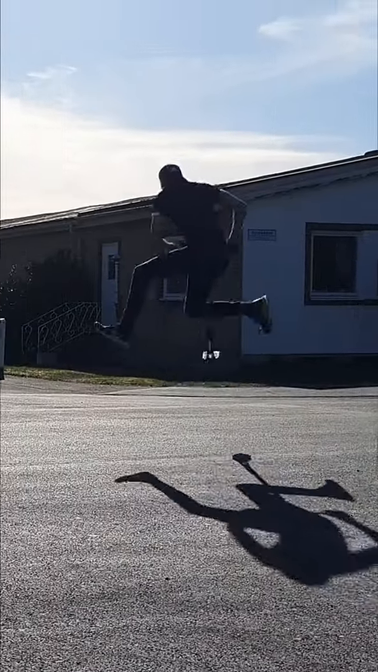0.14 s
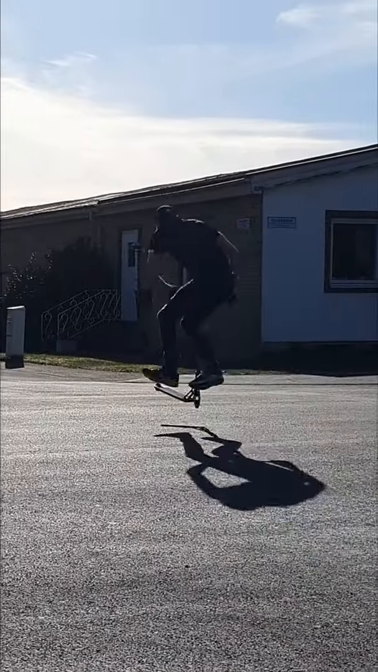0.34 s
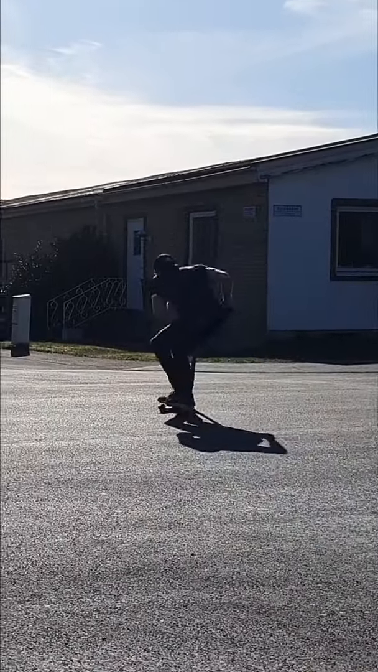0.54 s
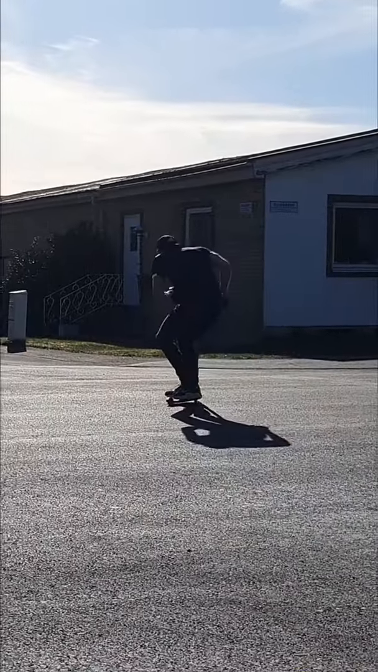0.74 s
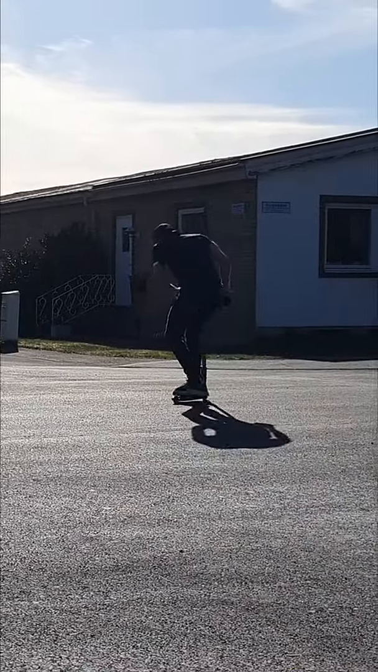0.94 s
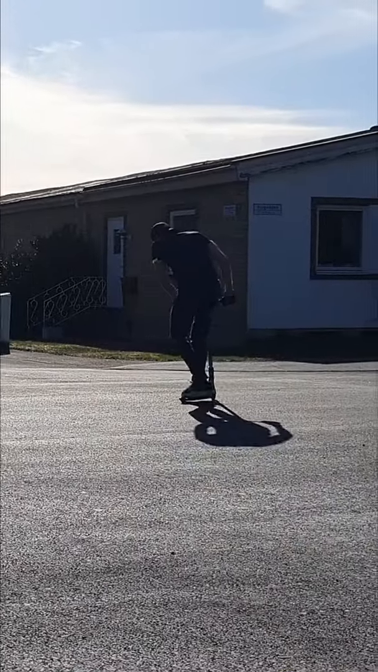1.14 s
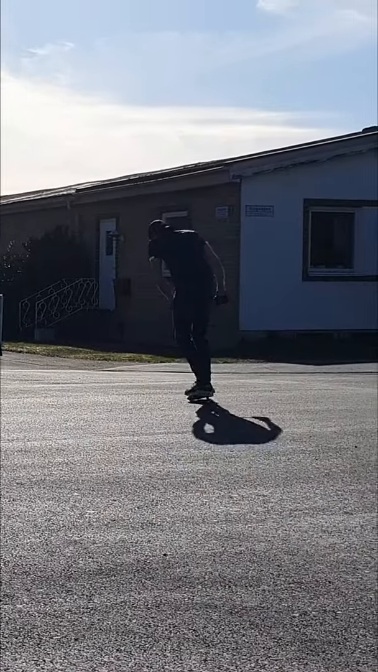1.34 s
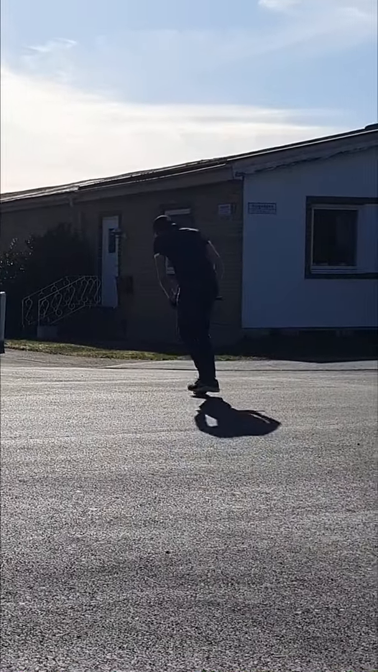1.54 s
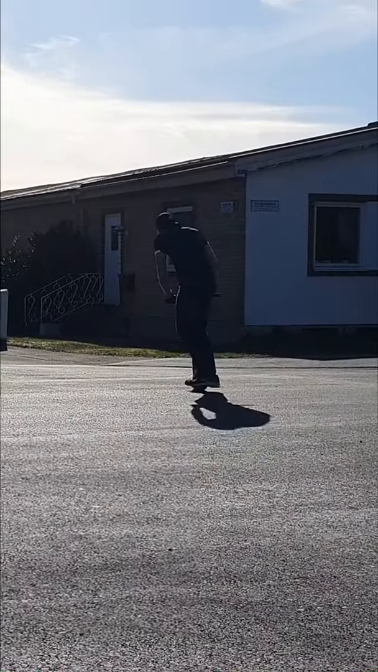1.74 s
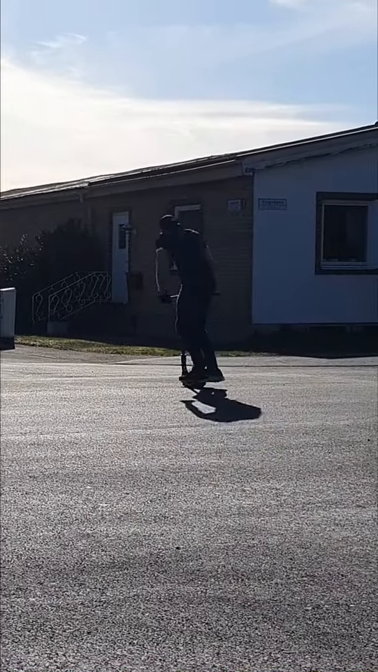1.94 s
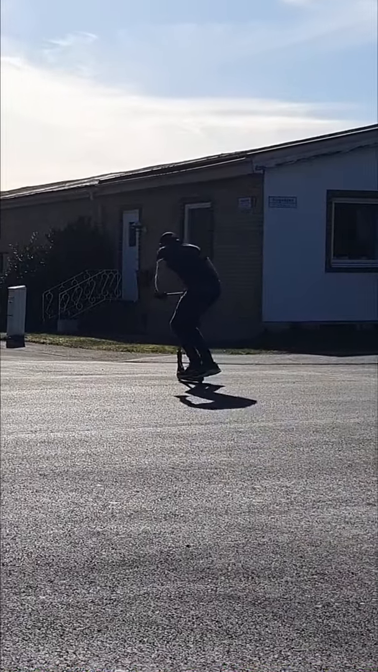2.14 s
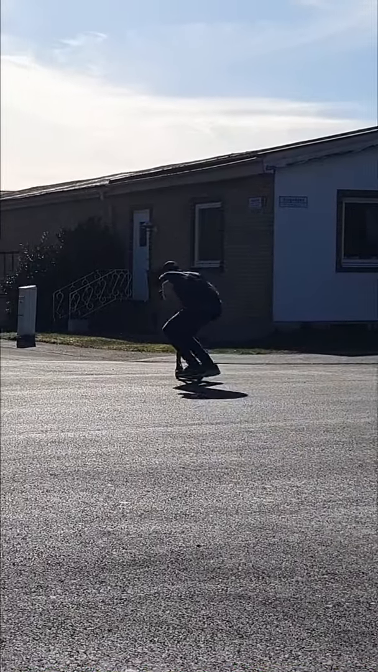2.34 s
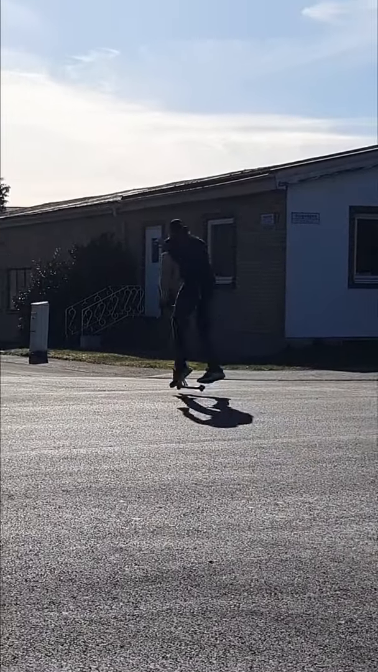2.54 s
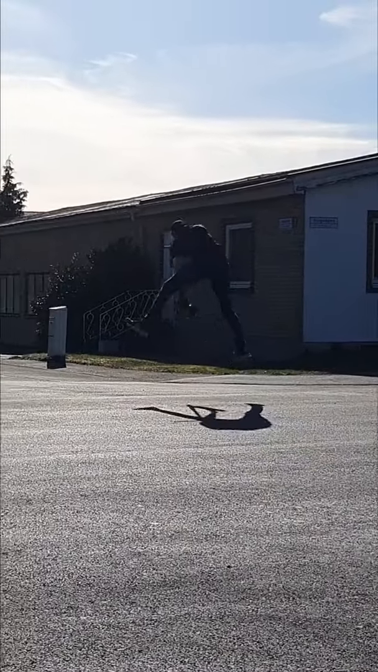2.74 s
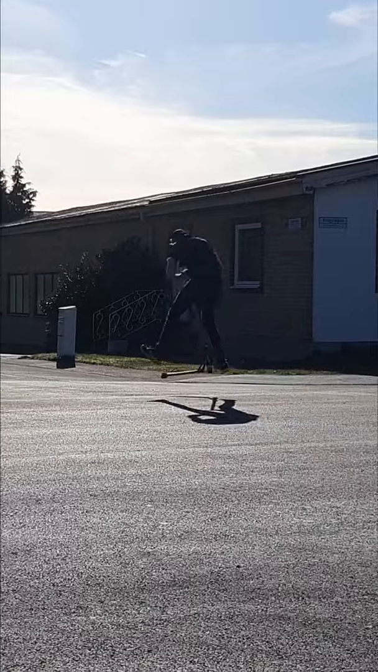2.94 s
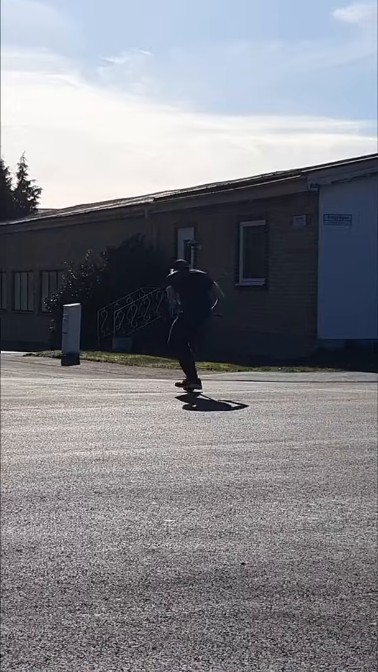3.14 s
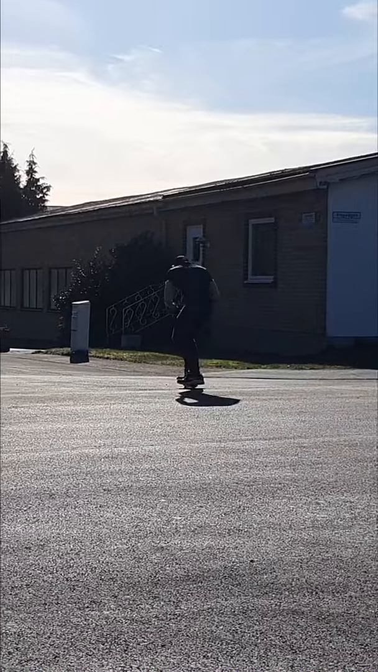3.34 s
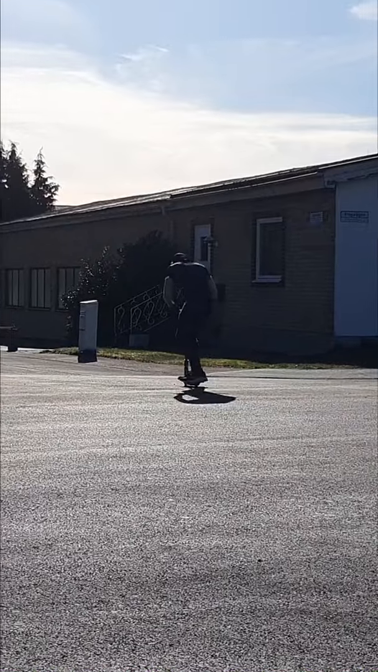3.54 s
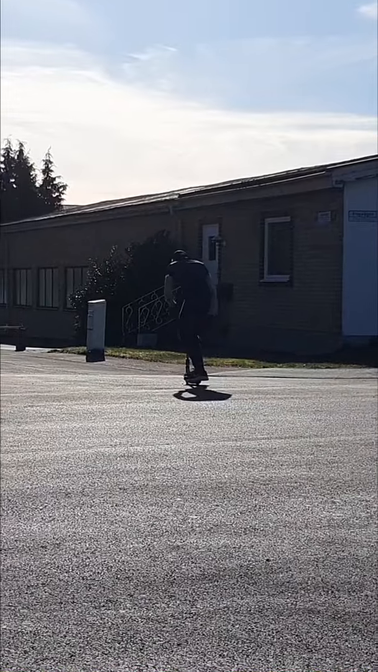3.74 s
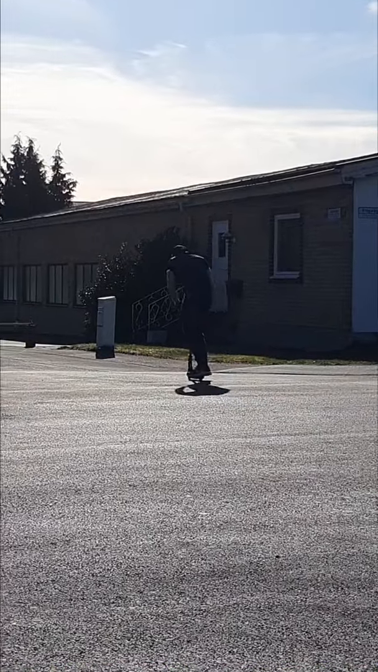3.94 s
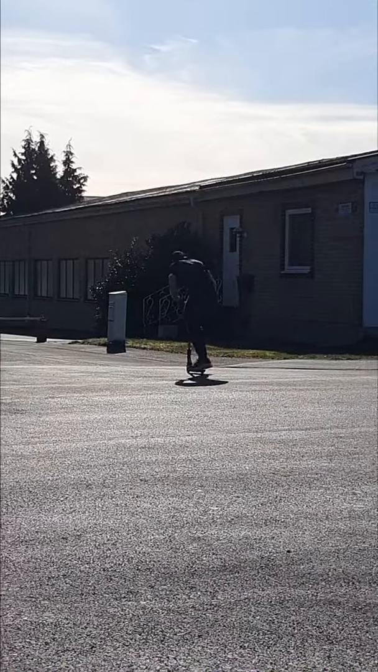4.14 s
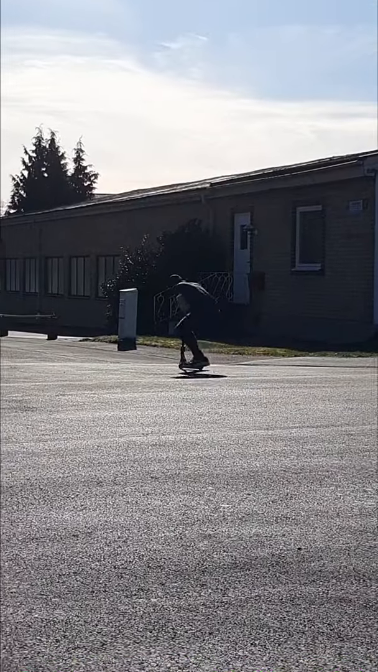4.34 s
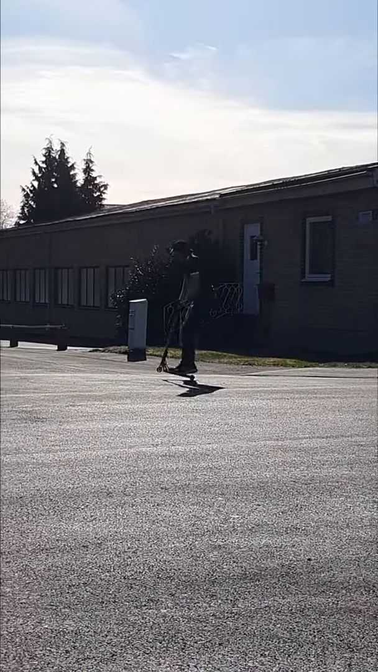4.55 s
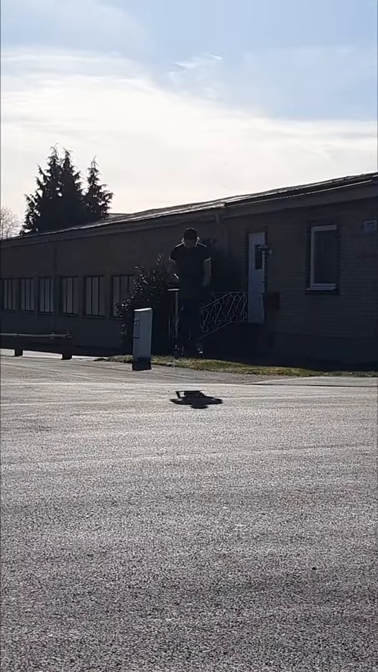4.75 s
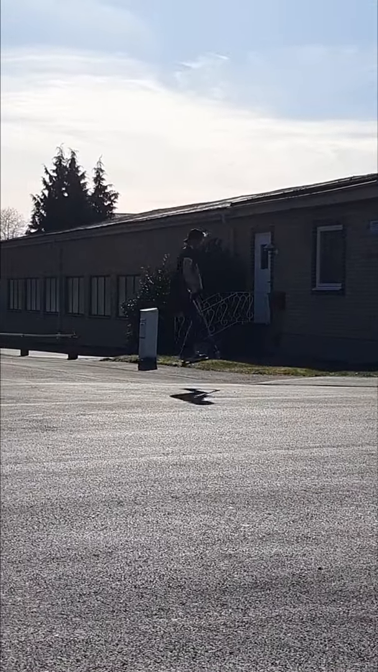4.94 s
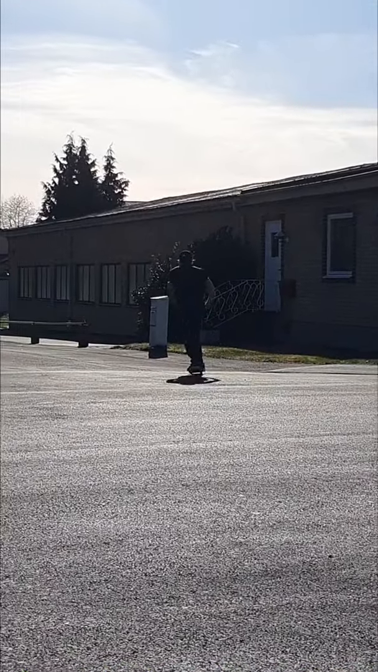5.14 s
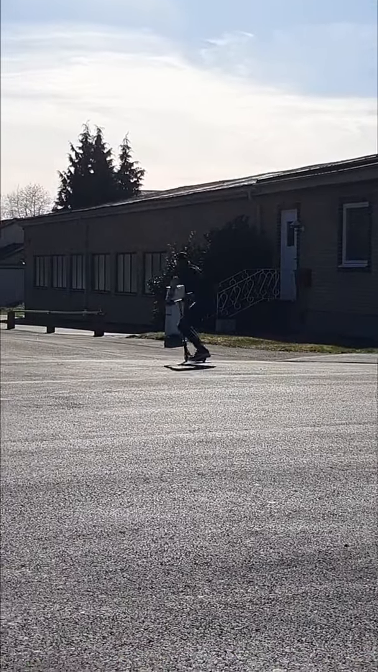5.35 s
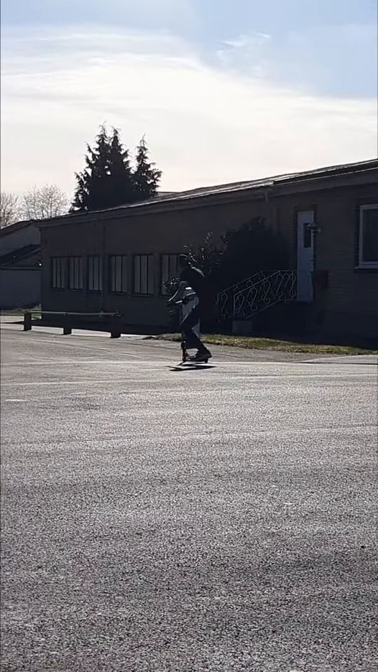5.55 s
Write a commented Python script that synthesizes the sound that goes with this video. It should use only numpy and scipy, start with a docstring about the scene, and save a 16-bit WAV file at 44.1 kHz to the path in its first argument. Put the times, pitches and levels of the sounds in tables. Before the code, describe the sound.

A scooter trick: light knocks, one loud echoing landing crack, then two more rattling jumps and landings, with low wind buffeting the microphone.

```python
"""On asphalt along low houses, a kick scooter rider jumps, spins the deck, lands and moves away.
Knocks are bursts of tiny grains that clack, clank and thud; the handlebar tubes ring as decaying tones.
Whirrs, rattles, swishes, scuffs and scrapes are uneven noise in moving bands; the walls echo them.
Wind puffs thump each microphone port as short, sagging swings, over a faint wash of far traffic."""
import sys
import numpy as np
from scipy import signal
from scipy.io import wavfile
from scipy.ndimage import uniform_filter1d

SR = 44100
rng = np.random.default_rng(int(sys.argv[2]) if len(sys.argv) > 2 else 0)


def transcribe(u):
    """Save the signal u as a 16-bit wav file named by the first command-line argument.

    u: samples, shape (n,) or (channels, n), limited to [-1, 1]; the rate is SR.
    q: integer samples, one column per channel.
    """
    v = np.clip(np.atleast_2d(u).T, -1, 1)
    q = np.round(v * 32767).astype(np.int16)
    wavfile.write(sys.argv[1], SR, q)


N = 246519  # length [samples]


def gain_of(db):
    """Turns decibels into a plain multiplier."""
    return 10 ** (np.asarray(db) / 20)


def evened(x):
    """Scales a sound to an average (RMS) strength of 1."""
    return x / np.sqrt(np.mean(x ** 2) + 1e-20)


def read(points, hz):
    """Reads a curve of (pitch, value) points, with pitch spaced by octaves as the ear hears it."""
    f, value = np.transpose(points)
    return np.interp(np.log(hz + 1), np.log(f + 1), value)


def add(mix, s, sound):
    """Adds a sound into the mix from s seconds on, cutting what runs past the end."""
    part = mix[..., round(s * SR):][..., :sound.shape[-1]]
    part += sound[..., :part.shape[-1]]


def sides(pan_db):
    """Gains of the two channels for a left-right difference; above zero is louder on the left."""
    return gain_of(np.array([pan_db / 2, -pan_db / 2]))


def coloured(x, points):
    """Gives x a spectrum with a filter that only looks back in time, so attacks stay sharp."""
    hz = abs(np.fft.fftfreq(8192, 1 / SR))
    log_gain = np.log(gain_of(np.maximum(read(points, hz), -100)))
    # the Hilbert transform finds the phase that puts the filter's energy first
    taps = np.fft.ifft(np.exp(np.conj(signal.hilbert(log_gain)))).real[:4096]
    return signal.oaconvolve(x, taps / np.linalg.norm(taps))[:len(x)]


def resonate(x, hz, width):
    """A resonance of gain 1: shifts the pitch hz (may glide) down to zero, smooths, shifts back."""
    turn = np.exp(2j * np.pi * np.cumsum(hz * np.ones(len(x))) / SR)
    keep = np.exp(-np.pi * width / SR)
    smooth = signal.lfilter([1 - keep], [1, -keep], x / turn)
    return 2 * (turn * smooth).real


def grit(count, spread_db):
    """Noise whose single samples differ widely in size: many tiny grains."""
    sizes = gain_of(spread_db * np.minimum(rng.exponential(1, count), 5))
    return evened(rng.standard_normal(count) * sizes)


# resonances of the metal deck: (pitch [Hz], width [Hz], relative level [dB])
DECK_MODES = [(730, 58, -1.5), (1110, 21, -7.5), (1514, 67, 1), (1800, 60, 9.5), (2160, 150, 2.5),
              (2608, 90, 10), (2890, 39, -2.5), (3340, 92, -8), (4320, 90, -10), (5000, 45, -11.5)]


def deck(x, bend=1):
    """The short, broad ring of the metal deck, a sum of resonances; bend detunes them all."""
    ring = 0
    for k, (hz, width, db) in enumerate(DECK_MODES):
        ring = ring + (-1) ** k * gain_of(db) * resonate(x, hz * bend, width)
    return evened(ring)


# knocks on deck and wheels, and a strong echoed knock (at 3.223 s): (time [s], clack level [dB],
# clank pitch [Hz], clank share [ratio], rise [ms], time to fall 60 dB [s],
# thud peak level [dB], thud pitch [Hz])
KNOCK_ROWS = [(.109, -39, 2340, 0.63, 1.85, 0.058, -23, 153),
              (0.133, -41.5, 1840, 0.8, 1.9, 0.098, -37.5, 590),
              (.495, -12, 2120, 0.062, 3.25, 0.082, -39, 795),
              (.5114, -34.5, 2910, 0.55, 2.9, 0.14, -19, 403), (0.612, -47, 1760, .3, 7, 0.1, -44, 323),
              (2.6196, -55.5, 1750, 1.35, 2.1, 0.18, -50.5, 910),
              (2.847, -32.5, 2545, 1.7, 3.8, 0.079, -38, 300),
              (3.128, -21.5, 2150, 0.66, 6.8, 0.099, -31, 704),
              (3.1468, -36.5, 2880, 0.4, 2.9, 0.15, -26.5, 310),
              (3.223, -43, 1594, 1.3, 6.4, 0.17, -43.5, 623),
              (3.272, -46.5, 2120, 0.8, 5.3, 0.1, -55.5, 700),
              (3.381, -53, 1930, 0.47, 4.4, 0.11, -43, 808),
              (3.8826, -54, 1900, 0.41, 2.3, 0.022, -42, 366),
              (4.676, -55, 2000, 0.49, 1.5, 0.19, -52.5, 940),
              (4.9029, -27.5, 2520, 0.93, 6.7, 0.23, -43, 940),
              (5.032, -53.5, 1900, 1.5, 3.9, 0.14, -48, 1005),
              (5.1725, -35.5, 2616, 1.1, 1.04, 0.13, -29.5, 255),
              (5.23, -34.5, 1704, 0.76, 1.14, 0.072, -29, 780)]
# colour of a knock before its own tilt: (pitch [Hz], relative level [dB per Hz])
CLACK_COLOUR = [(180, -42), (300, -9), (1250, -10.5), (2170, -12), (3080, -10.5), (4220, -16), (6610, -22),
                (7810, -33.5), (8630, -26), (16000, -42.5)]
# stiffer parts clank higher and brighter: dB an octave of treble, per octave of clank
NEUTRAL_HZ, TILT_DB, TILT_TOP_DB = 2140, 16.5, 8
THIN_HZ, THIN_SHARE = 800, .6  # brighter knocks also lose body under this pitch


def knocks():
    """Each knock: a burst of grains through the deck, one part clanking out, and a dull thud."""
    t, out = np.arange(SR // 3) / SR, np.zeros(N)
    for s, db, clank_hz, clank_share, rise_ms, t60, thud_db, thud_hz in KNOCK_ROWS:
        rise = 1 - np.exp(-(1000 * t / rise_ms) ** 2)
        shape = rise * gain_of(-60 * (t / t60) ** 0.79)

        tilt_db = min(TILT_DB * np.log2(clank_hz / NEUTRAL_HZ), TILT_TOP_DB)
        colour = []
        for hz, level in CLACK_COLOUR:
            treble_octaves = max(np.log2(hz / 3000), 0)
            body_octaves = max(np.log2(THIN_HZ / hz), 0)
            colour.append((hz, level + tilt_db * (treble_octaves - THIN_SHARE * body_octaves)))

        grains = grit(len(t), 2.4)
        crack = coloured(grains, colour)
        clank = evened(resonate(resonate(grains, clank_hz, 330), clank_hz, 330))
        clack = evened(crack) + deck(crack) + clank_share * clank

        push = resonate(rng.standard_normal(len(t)) * shape ** 1.03, thud_hz, 0.38 * thud_hz)
        push = push / abs(push).max()
        # the thud also sets off a low boom, as the microphone's bass cut rings
        boom = resonate(resonate(np.gradient(abs(push)), 90, 78), 90, 78)
        thud = push + 0.96 * boom / abs(boom).max()
        add(out, s - .002, gain_of(db) * clack * shape + gain_of(thud_db) * thud)
    return out


# handlebar tubes: (pitch [Hz], time to fall 60 dB when left free [s])
TUBE_MODES = [(3567, 1.5), (3946, 0.7), (3720, 0.58)]
# knocks that reach the handlebar: (time [s], damping by the grip [dB/s], level of each tube [dB] x 3)
TUBE_RINGS = [(.5, 6.4, -74.5, -43, -66), (3.16, 77, -52, -49.5, -66), (4.93, 39, -68, -55.5, -66),
              (5.233, 12, -65, -60.5, -51)]


def tubes():
    """The handlebar tubes ring on, wavering a little as loose parts keep touching them."""
    t, out = np.arange(SR) / SR, np.zeros(N)
    onset = 1 - np.exp(-t / 0.0049)
    for s, grip, *levels in TUBE_RINGS:
        for (hz, t60), db in zip(TUBE_MODES, levels):
            waver = evened(resonate(rng.standard_normal(len(t)), hz, 30))
            ring = np.sin(2 * np.pi * hz * t) + .35 * waver
            add(out, s, gain_of(db - (60 / t60 + grip) * t) * ring * onset)
    return out


def rub(strokes, band):
    """Uneven tiny grains, partly through the deck, heard in the band of the rubbing part."""
    out = np.zeros(N)
    for stroke in strokes:
        start, end, start_db, end_db, hz, width, share, detune, grain_db, drift, fade = stroke + band
        count = round((end - start) * SR)
        uneven = evened(uniform_filter1d(rng.standard_normal(count + 3000), 300))[:count]
        wander = evened(uniform_filter1d(rng.standard_normal(count + 3000), 2500))[:count]
        grains = grit(count, grain_db)
        moving_hz = hz * (1 + drift * wander[::-1])
        body = grains + share * deck(grains, 1 + detune * wander)
        heard = evened(resonate(resonate(body, moving_hz, width), moving_hz, 0.81 * width))
        level = gain_of(np.linspace(start_db, end_db, count) + 1.9 * uneven)
        u = np.arange(count)
        fade_in = np.minimum(u / 300, 1)  # sets in fast
        fade_out = np.minimum((count - u) / (fade * count), 1)
        add(out, start, heard * level * fade_in * fade_out)
    return out


# wheels whirring free while the deck swings:
# (start time [s], end time [s], start level [dB], end level [dB])
WHIRR_STROKES = [(0, .12, -57, -45), (.107, .32, -49.5, -61), (.313, .41, -56, -55.5),
                 (.38, .5, -59.5, -43), (2.99, 3.14, -64, -60.5), (4.225, 4.33, -69.5, -68.5)]
# their band: (pitch [Hz], width [Hz], share through the deck [ratio], detuning of the deck [ratio],
# grain [dB], drift of the band [ratio], share of the length spent fading [ratio])
WHIRR_BAND = (2094, 1010, 1.099, 0.05, 4.5, 0.04, .15)


def whirrs():
    """Free wheels: grainy noise, about as much through the deck as direct, in a fairly steady band."""
    return rub(WHIRR_STROKES, WHIRR_BAND)


# loose parts rattling before and after the landings:
# (start time [s], end time [s], start level [dB], end level [dB])
RATTLE_STROKES = [(.59, .899, -57.5, -54), (2.87, 3.12, -60.5, -62), (3.203, 3.47, -58, -53.5),
                  (4.725, 4.913, -71, -30), (4.948, 5.14, -75, -66), (5.25, 5.47, -60.5, -58)]
# their band, columns as in WHIRR_BAND
RATTLE_BAND = (2498, 5498, -0.9, 0.25, 2.8, -0.5, 0.88)


def rattles():
    """Loose parts: grains and their deck ring in a broad band that roams widely."""
    return rub(RATTLE_STROKES, RATTLE_BAND)


# clothes swishing in the jump: (start time [s], end time [s], start level [dB], end level [dB])
SWISH_STROKES = [(0, .33, -59.5, -62.5), (.29, .52, -64.5, -50)]
# their band, columns as in WHIRR_BAND
SWISH_BAND = (5296.5, 6998.5, 0, 0, 0.5, -0.2, 0.3)


def swishes():
    """Cloth: fine-grained noise in a broad, bright band, none of it through the deck."""
    return rub(SWISH_STROKES, SWISH_BAND)


# shoes and wheels scuffing:
# (start time [s], end time [s], start level [dB], end level [dB], pitch [Hz], width [Hz])
SCUFF_STROKES = [(0, .53, -65, -61, 695, 545), (3.234, 3.411, -57, -49, 730, 169),
                 (4.3, 4.609, -69.5, -41, 350, 534), (4.42, 4.6, -69, -64, 778, 396),
                 (5.248, 5.43, -66, -55, 730, 540)]
# their band, columns as in WHIRR_BAND without pitch and width, which come from each row
SCUFF_BAND = (0.014, 0, 1.5, 0, 0.68)


def scuffs():
    """Scuffs: low bands of rubbing noise, hardly any of it through the deck."""
    return rub(SCUFF_STROKES, SCUFF_BAND)


# a faint scrape from the wheels, mostly as the rider crouches to jump:
# (start time [s], end time [s], start level [dB], end level [dB])
SCRAPE_STROKES = [(1.12, 1.55, -85, -70), (2.592, 2.8, -69.5, -66.5), (2.79, 2.87, -81, -51),
                  (4.461, 4.59, -73, -61), (4.79, 4.93, -65.5, -50)]
# its band, columns as in WHIRR_BAND
SCRAPE_BAND = (2514, 610, 1.4, 0.036, 1.8, .015, 0.67)


def scrapes():
    """Scraping wheels: rubbing noise, mostly through the deck, in a fairly narrow band."""
    return rub(SCRAPE_STROKES, SCRAPE_BAND)


# how fast the echoes die: (pitch [Hz], time to fall 60 dB [s])
WALL_DECAY = [(100, 0.9), (500, 0.56), (4000, 0.82), (8000, 0.67), (14000, 0.77)]
# the house fronts answer late, with a slap; only the ground and near things before
ECHO_S, ECHO_DB, ECHO_SPREAD_S, EARLY_DB = .094, 9, 0.013, -1.5


def walls(x):
    """Echoes: sparse taps of random sign, one in every 20 samples, each band dying at its own speed."""
    taps = np.zeros((2, SR))
    at = np.arange(100, SR - 20, 20) + rng.integers(0, 20, (2, (SR - 101) // 20))
    np.put_along_axis(taps, at, rng.choice([-1., 1.], at.shape), 1)
    taps[1] = 0.1 * taps[0] + 1.08 * taps[1]  # both ports share some of the echoes

    hz, t, z = signal.stft(taps, SR, nperseg=256)
    dying = gain_of(-60 * t / read(WALL_DECAY, hz)[:, None])
    tail = signal.istft(z * dying, SR, nperseg=256)[1]
    late = np.arange(tail.shape[1]) / SR - ECHO_S
    slap_db = ECHO_DB * np.exp(-np.maximum(late, 0) / ECHO_SPREAD_S)
    tail = tail * gain_of(np.where(late < 0, EARLY_DB, slap_db))

    echoes = signal.fftconvolve(x[None], tail / np.linalg.norm(tail[0]), axes=1)[:, :N]
    z = signal.stft(echoes, nperseg=256)[2]
    # random phases blur the pitches of the echoes
    z = z * np.exp(2j * np.pi * rng.random(z.shape[1:]))
    return signal.istft(z, nperseg=256)[1][:, :N]


# colour of the two ports: (pitch [Hz], left-right difference [dB])
PORT_COLOUR = [(100, 1), (400, 5.5), (1200, 4), (2400, 6.5), (5000, 12), (8500, -0.5), (13000, -3.5)]
# the left port hears the rider later: (time [s], delay [microseconds])
LEFT_LAG = [(0, 90), (5.59, 22)]


def ports(x):
    """Air dulls the treble; each port has its own colour, the left one lags, eddies blur their likeness."""
    hz, t, z = signal.stft(x, SR, nperseg=512)
    hz = hz[:, None]
    air = gain_of(-(8.5 + 2.2 * t) * (hz / 12000) ** 2)  # duller as the rider moves away
    z = z * sides(read(PORT_COLOUR, hz)) * air
    lag = np.interp(t, *np.transpose(LEFT_LAG)) * 1e-6
    z[0] *= np.exp(-2j * np.pi * hz * lag)
    a, b = rng.standard_normal((2, len(hz), len(t)))
    z[1] *= 1 + .3 * (a + 1j * b) * np.minimum(hz / 3000, 1)
    z *= 1 - 0.42 * np.exp(-((hz - 7900) / 500) ** 2)  # the housing has a notch in the treble
    return signal.istft(z, SR, nperseg=512)[1][:, :N]


# strength of the gusty buffeting: (time [s], level [dB])
WIND_LEVEL = [(0, -53.5), (0.561, -42), (1.203, -61), (1.301, -43), (1.68, -56), (1.749, -43),
              (2.103, -46.5), (2.42, -63), (2.499, -46.5), (3.099, -34.5), (3.55, -49), (3.91, -51.5),
              (3.959, -37), (4.55, -39.5), (4.66, -63.5), (4.721, -45), (5.252, -42), (5.45, -57.5)]
# colour of the buffeting: (pitch [Hz], relative level [dB per Hz])
BUFFET_COLOUR = [(12, -42), (20, -20.5), (51, -4.5), (76, -3.5), (133, -18.5), (362, -37.5), (520, -83.5)]
# strongest puffs: (time [s], level at the louder port [dB], left-right difference [dB])
PUFF_ROWS = [(0.7, -28, -28), (1.399, -32.5, -19), (1.762, -31, -13.5), (1.876, -22.5, -25.5),
             (2.019, -27.5, -8.5), (2.617, -29.5, -36.5), (2.766, -20.5, -32.5), (2.898, -23.5, -29),
             (2.944, -26, -42), (3.043, -19, 24), (3.086, -24.5, 19), (3.748, -24.5, 10.5),
             (3.946, -24.5, -16.5), (4.09, -21, 9), (4.275, -25.5, 29), (4.337, -15.5, -30.5),
             (4.413, -24.5, -28), (4.537, -26.5, 9), (4.7, -23.5, 40.5), (4.775, -21.5, 30),
             (4.872, -20, -35)]
# stronger puffs swing faster: pitch at this level, rise per dB, and random spread as a ratio
PUFF_HZ, PUFF_DB, HZ_PER_DB, PUFF_SPREAD = 78.4, -19.5, 1, 0.072


def wind():
    """Pressure lumps, unrelated at the two ports, ring the bass cut of the microphone."""
    present = rng.random((2, N)) < 150 / SR  # about 150 lumps a second
    sizes = gain_of(np.minimum(rng.exponential(1, (2, N)), 4))
    lumps = rng.standard_normal((2, N)) * present * sizes
    out = np.array([evened(coloured(uniform_filter1d(port, 90), BUFFET_COLOUR)) for port in lumps])
    out = out * gain_of(np.interp(np.arange(N) / SR, *np.transpose(WIND_LEVEL)))

    t = np.arange(-SR // 20, SR // 20) / SR
    for s, db, pan_db in PUFF_ROWS:
        hz = PUFF_HZ + HZ_PER_DB * (db - PUFF_DB)
        hz = hz * (1 + PUFF_SPREAD * rng.uniform(-1, 1))
        turn = rng.random((2, 1))  # each port starts anywhere in the cycle
        # a cycle or two, quick in, slower out
        swing = np.exp(-abs(t * hz / np.where(t < 0, .55, .85)) ** 0.94)
        puff = swing * np.sin(2 * np.pi * (hz * t * (1 - 11.2 * t) + turn))  # the pitch sags
        # a sharper edge at the peak
        puff = puff + 0.31 * swing ** 3 * np.sin(2 * np.pi * (1.84 * hz * t + turn))
        add(out, s + t[0], gain_of(db - abs(pan_db) / 2) * sides(pan_db)[:, None] * puff)
    return out


# colour of the far traffic: (pitch [Hz], relative level [dB per Hz])
TOWN_COLOUR = [(88, -25), (150, -7), (241, -8), (711, -8), (1120, -14), (1700, -17.5), (2310, -27),
               (8070, -45), (12300, -44.5), (14000, -79.5)]
TOWN_DB, SAME = -61.5, 0.053  # level of the wash, and its left-right likeness (0 to 1)


def town():
    """Far traffic wash: random short-time spectra with drifting patches and a slow swell."""
    frames, hz = N // 256 + 5, np.fft.rfftfreq(1024, 1 / SR)
    a, b, c, d, patches = rng.standard_normal((5, len(hz), frames))
    patches = evened(uniform_filter1d(uniform_filter1d(patches, 12, 0), 14, 1))
    t = np.arange(frames) * 256 / SR
    swell = np.zeros(frames)
    for f in np.geomspace(.3, 8, 20):  # slow waves [Hz], the slowest strongest
        swell += np.sin(2 * np.pi * (f * t + rng.random())) / np.sqrt(f)
    left = a + 1j * b
    right = SAME * left + np.sqrt(1 - SAME ** 2) * (c + 1j * d)
    level_db = read(TOWN_COLOUR, hz)[:, None] + 1.3 * patches + 0.89 * evened(swell)
    z = np.array([left, right]) * gain_of(level_db)
    return gain_of(TOWN_DB) * evened(signal.istft(z, nperseg=1024, noverlap=768)[1][:, :N])


def scene():
    """The scooter and its echoes reach the ports; wind and far traffic join in there."""
    scooter = knocks() + whirrs() + rattles() + swishes() + scuffs() + scrapes()
    echoes = gain_of(-11.5) * walls(scooter)
    return ports(scooter + tubes() + echoes) + wind() + town()


def record(dry):
    """The band limit: a steep filter removes everything above about 16 kHz."""
    low_pass = signal.firwin(511, 16050, window=("kaiser", 9), fs=SR)
    return signal.oaconvolve(dry, low_pass[None], "same")


dry = scene()
out = record(dry)
transcribe(out)
```